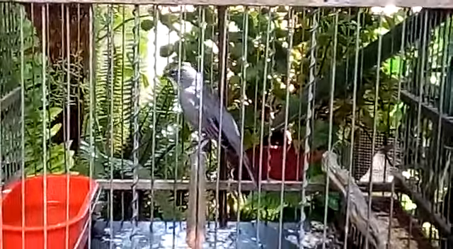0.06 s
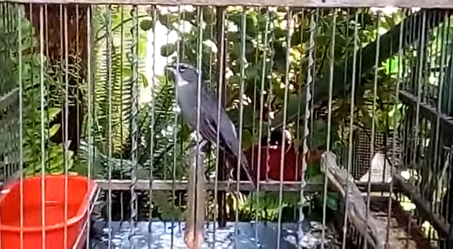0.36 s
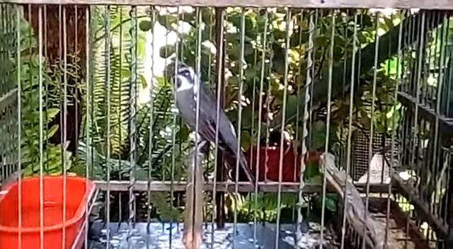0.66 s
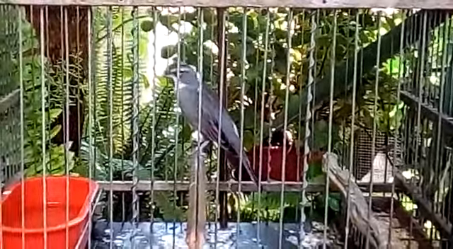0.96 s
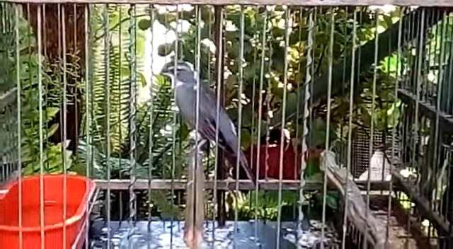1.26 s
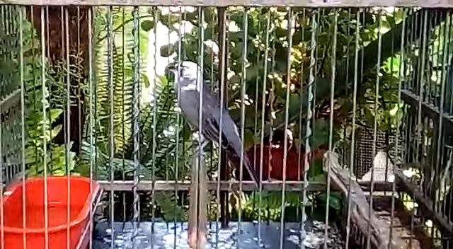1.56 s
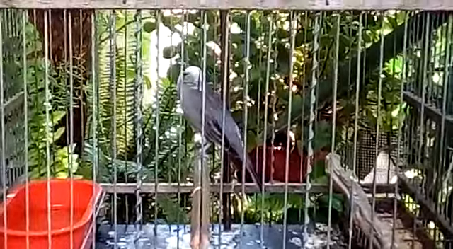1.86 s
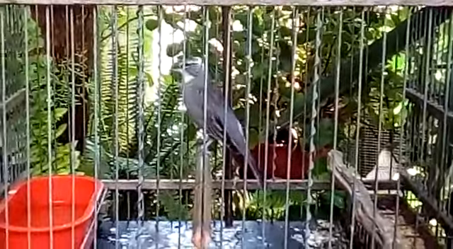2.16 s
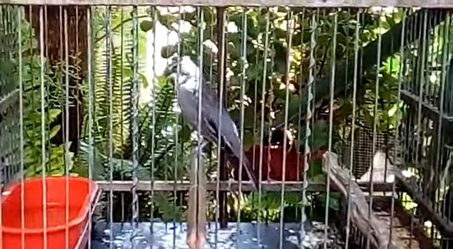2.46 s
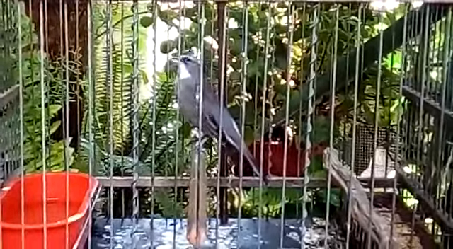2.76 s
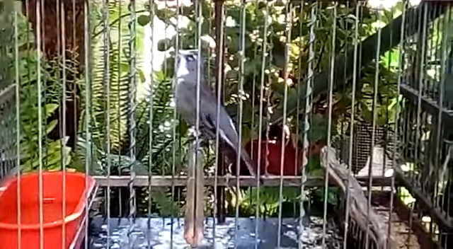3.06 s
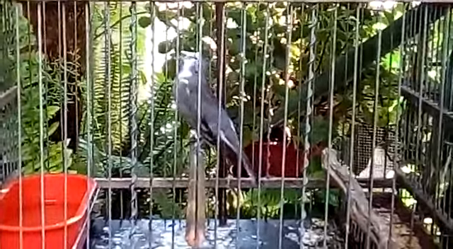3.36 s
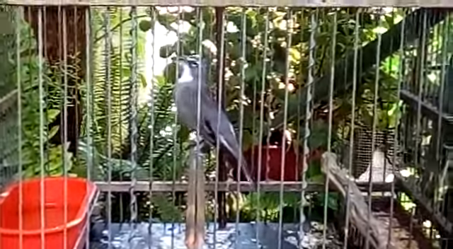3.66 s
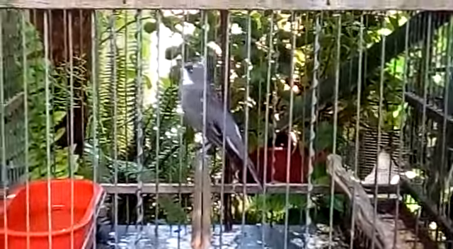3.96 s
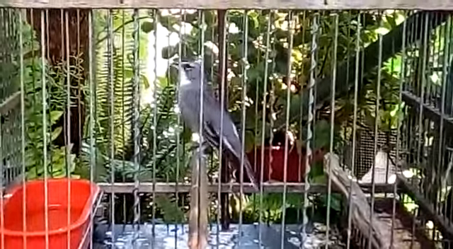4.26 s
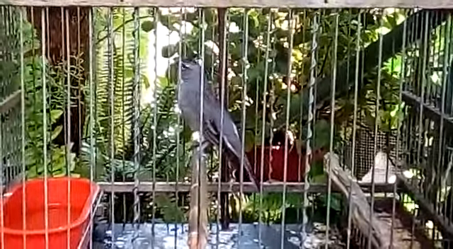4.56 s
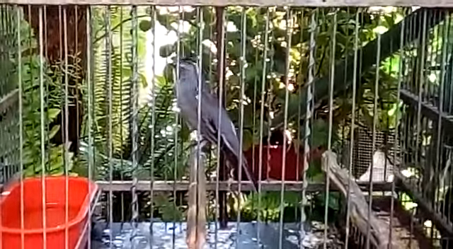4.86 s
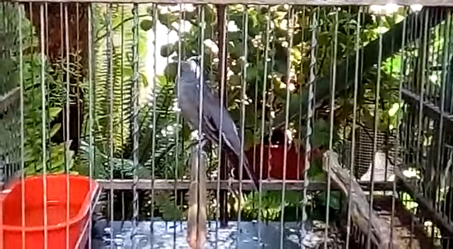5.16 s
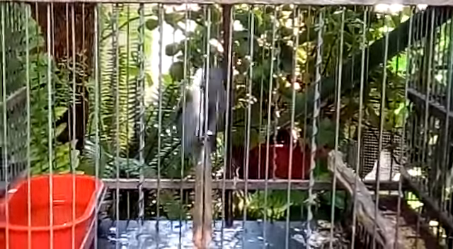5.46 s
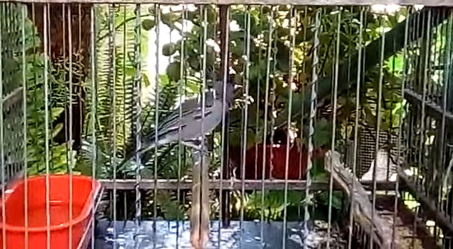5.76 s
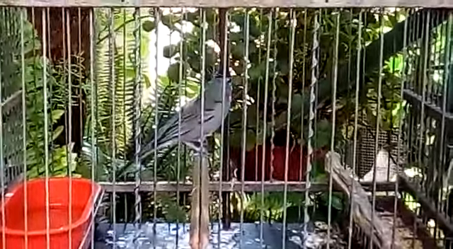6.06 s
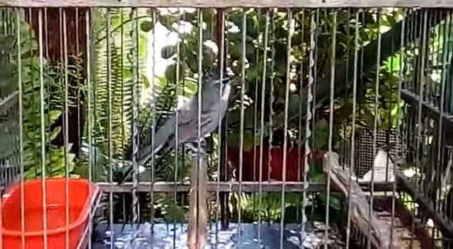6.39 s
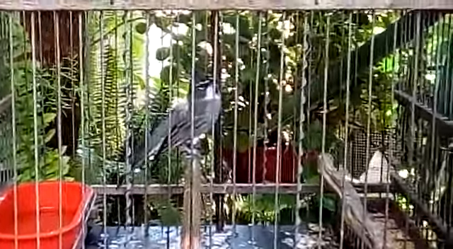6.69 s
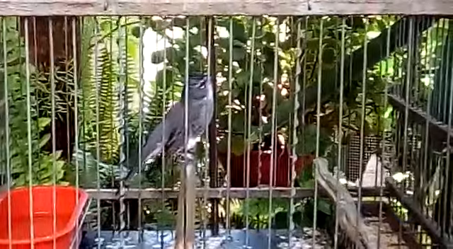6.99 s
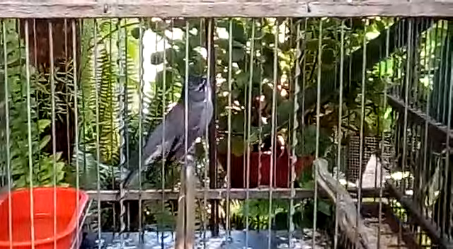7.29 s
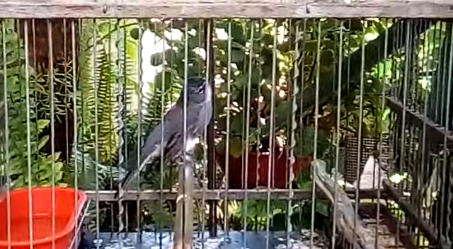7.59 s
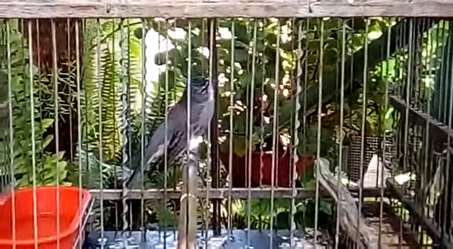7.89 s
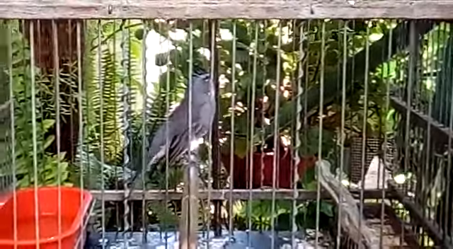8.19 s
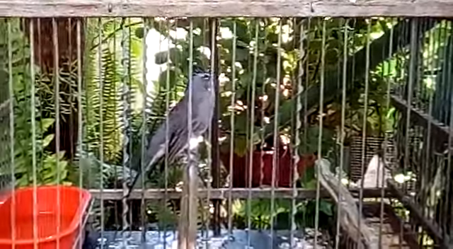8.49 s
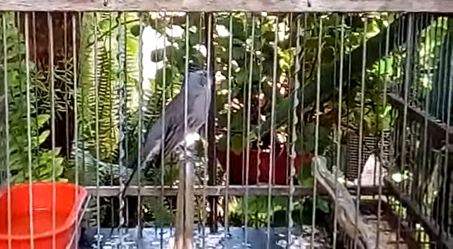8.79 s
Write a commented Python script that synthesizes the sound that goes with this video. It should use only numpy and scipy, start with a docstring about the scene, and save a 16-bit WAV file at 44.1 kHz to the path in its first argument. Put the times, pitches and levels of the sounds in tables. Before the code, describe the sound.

Loud, gliding whistles from a nearby songbird come in two phrases over a quiet garden hush and far-off chirping.

```python
"""A caged songbird close by sings two phrases of six loud slurred whistles. Each is a gliding tone that
swells where it crosses the resonance of the throat; faint overtones leave through the beak.
The cage adds quick reflections, and the garden walls reverberate after each note. Other birds chirp
farther off, mostly as echo, among soft scuffs and faint hoots. Behind them lie a quiet outdoor hush
and the drone of distant traffic."""
import sys
import numpy as np
from scipy import signal
from scipy.fft import rfft, irfft, next_fast_len
from scipy.io import wavfile
from scipy.ndimage import uniform_filter1d, map_coordinates

SR = 44100
rng = np.random.default_rng(int(sys.argv[2]) if len(sys.argv) > 2 else 0)


def put_to_file(sound):
    """Save the sound as 16-bit audio at rate SR, in the file named by the first command-line argument."""
    columns = np.atleast_2d(sound).T  # one column per channel
    safe = np.clip(columns, -1, 1)
    whole_steps = np.round(safe * 32767)
    wavfile.write(sys.argv[1], SR, whole_steps.astype(np.int16))


N = 389844


def amp(db):
    """Amplitude ratio of a level in decibels."""
    return 10 ** (np.asarray(db) / 20)


def unit(x):
    """Normalisation to rms 1."""
    return x / np.sqrt(np.mean(x ** 2) + 1e-20)


def along(points, hz):
    """Interpolation of (Hz, value) points on a logarithmic frequency axis."""
    freqs, values = np.transpose(points)
    return np.interp(np.log(hz + 1), np.log(freqs + 1), values)


def curves(rows):
    """Linear interpolation in time: one curve for each column after the first."""
    times, *columns = np.transpose(rows)
    return [np.interp(np.arange(N) / SR, times, column) for column in columns]


def wobble(rate, size):
    """Smooth random modulation with `rate` knots a second."""
    knots = rng.standard_normal(int(size * rate / SR) + 4)
    return map_coordinates(knots, [np.arange(size) * rate / SR])


def filtered(x, response):
    """Linear filtering: the spectrum is multiplied by a frequency response."""
    size = next_fast_len(N + SR // 2)
    return irfft(rfft(x, size) * response(np.fft.rfftfreq(size, 1 / SR)), size)[:N]


def coloured(x, spectrum):
    """Spectral shaping by a curve of (Hz, dB) points."""
    return filtered(x, lambda hz: amp(along(spectrum, hz)))


def noise(spectrum):
    """Spectrally shaped Gaussian noise of rms 1."""
    return unit(coloured(rng.standard_normal(N), spectrum))


def add(track, start, sound):
    """Superposition of a sound on the track, from `start` seconds."""
    part = track[max(0, round(start * SR)):][:len(sound)]
    part += sound[:len(part)]


def partial(pitch, order=1):
    """One harmonic: phase is the integral of frequency. Silent above the Nyquist limit."""
    return np.sin(2 * np.pi * order * np.cumsum(pitch) / SR) * (order * pitch < SR / 2)


def slur(times, hz, waver, waver_rate, glide_s=0.0044, attack_s=0.0092, release_s=0.0073):
    """Frequency modulation: the pitch and on-off gate of a gliding, wavering tone."""
    times = np.sort(times)
    t = np.arange(0, times[-1], 1 / SR)
    log_pitch = np.interp(t, times, np.log(hz))
    pitch = np.exp(uniform_filter1d(log_pitch, max(1, int(glide_s * SR)), mode="nearest"))
    edges = np.clip(np.minimum(t / attack_s, (t[-1] - t) / release_s), 0, 1)
    gate = np.sin(np.pi / 2 * edges) ** 2
    return pitch * (1 + waver * np.tanh(wobble(waver_rate, len(t)))), gate


def swept(length, hz, db, waver, waver_rate, edge_db=4.5):
    """Pitch and envelope of a sweep through pitches evenly spaced in time, loudest halfway."""
    pitch, gate = slur(np.linspace(0, length, len(hz)), hz, waver, waver_rate)
    return pitch, gate * amp(db - edge_db * np.linspace(-1, 1, len(gate)) ** 2)


def patchy(x, depth_db, corner_hz=2500):
    """Random amplitude modulation: low and middle bands swell and sink independently."""
    hz, _, spectra = signal.stft(x, SR, nperseg=2048)
    field = uniform_filter1d(rng.standard_normal(spectra.shape), size=3, axis=0)
    field = uniform_filter1d(field, size=7, axis=1)
    depth = depth_db / (1 + (hz[:, None] / corner_hz) ** 2)
    return signal.istft(spectra * amp(depth * unit(field)), SR, nperseg=2048)[1][:N]


# Spectra of the hush and the traffic. Each row: frequency in Hz, relative spectral density in dB.
HUSH_SPECTRUM = [(25, -12.5), (55, -5), (120, -3), (300, -2.5), (700, -5), (1300, -7), (1900, -9),
                 (3000, -16), (6300, -18.5), (8500, -31.5), (13500, -30.5), (15200, -20)]
RUMBLE_SPECTRUM = [(25, -33), (60, -14.5), (85, -4.5), (160, 10), (260, -28.5), (600, -59.5)]
DRONE_SPECTRUM = [(80, -41.5), (170, -7), (230, -2), (280, -1), (380, -18.5), (900, -49.5)]
# Swell of the traffic. Each row: time in seconds, relative levels of rumble and drone in dB.
TRAFFIC_LEVELS = [(0.0, -81, -79), (0.93, -78, -88), (1.77, -81, -73.5), (2.56, -75.5, -71),
                  (3.99, -73.5, -75.5), (4.41, -74, -69), (5.12, -78.5, -74), (8.1, -79, -77.5),
                  (8.84, -77, -67)]


def hush_and_traffic(hush_db=-66.5, rumble_db=-1, drone_db=-4):
    """Incoherent noises add: a broad outdoor hush and two low bands of distant traffic."""
    rumble_level, drone_level = curves(TRAFFIC_LEVELS)
    rumble = amp(rumble_level + rumble_db) * noise(RUMBLE_SPECTRUM)
    drone = amp(drone_level + drone_db) * noise(DRONE_SPECTRUM)
    hush = amp(hush_db) * noise(HUSH_SPECTRUM)
    return patchy(hush + rumble + drone, depth_db=2.5)


# Throb of one far engine's hum. Each row: time in seconds, relative level in dB.
HUM_LEVELS = [(2.0, -81), (2.48, -60.5), (2.57, -84.5), (2.68, -59.5), (2.88, -78.5), (2.93, -62),
              (3.12, -76), (3.2, -58), (3.35, -82), (3.52, -59), (3.81, -99), (3.92, -66), (5.45, -81.5),
              (5.56, -61.5), (5.94, -98), (6.06, -73), (7.22, -83.5), (7.28, -70), (7.7, -65.5),
              (7.83, -82), (8.25, -60), (8.57, -74.5), (8.76, -53.5), (8.84, -62)]
# Drift of that hum. Each row: time in seconds, pitch in Hz.
HUM_PITCH = [(2.0, 214.7), (2.7, 226), (3.3, 221.3), (5.5, 217.8), (8.84, 220.9)]
# Other engines. Each row: start and length in seconds, first and last pitch in Hz, mid level in dB.
ENGINE_TONES = [(0.799, 3.1, 117.1, 126.9, -76.5), (2.2, 1.02, 271.4, 273.2, -69),
                (3.35, 0.34, 271, 268.2, -70.5), (4.15, 0.69, 165.5, 170, -69),
                (5.3, 0.46, 175.3, 174.6, -72), (6.1, 0.36, 182.3, 190.6, -70),
                (5.1, 1.3, 83.4, 88.9, -74.5)]


def engines(hum_db=-2, throb_db=2):
    """Frequency follows engine speed: low, distant tones glide and throb."""
    pitch = curves(HUM_PITCH)[0] * (1 + 0.005 * wobble(36, N))
    fade_in = np.clip(np.arange(N) / SR - HUM_LEVELS[0][0] + 1, 0, 1)
    level = amp(curves(HUM_LEVELS)[0] + hum_db + throb_db * wobble(12, N))
    out = level * fade_in * unit(partial(pitch))
    for start, length, *hz, db in ENGINE_TONES:
        pitch, level = swept(length, hz, db, waver=0.0087, waver_rate=110)
        throb = amp(throb_db * wobble(3, len(level)))
        add(out, start, level * throb * partial(pitch))
    return out


# Spectrum of a scuff. Each row: frequency in Hz, relative spectral density in dB.
SCUFF_SPECTRUM = [(150, -30), (550, -0.5), (1900, -6), (3500, -13), (9000, -49)]
# Soft scuffs nearby. Each row: time of the peak in seconds, relative level in dB.
SCUFF_PEAKS = [(0.171, -61), (2.109, -65), (3.502, -69.5), (4.02, -70.5), (4.52, -68)]


def scuffs(width_s=0.037):
    """Noise under brief Gaussian envelopes is heard as soft scuffs."""
    t = np.arange(N) / SR
    envelope = sum(amp(db) * np.exp(-((t - peak) / width_s) ** 2) for peak, db in SCUFF_PEAKS)
    return envelope * noise(SCUFF_SPECTRUM)


# Faint far hoots. Each row: start and length in seconds, pitch in Hz, relative level in dB.
FAR_HOOTS = [(0.149, 0.62, 1850, -77.5), (4.102, 0.097, 848, -62.5), (6.6, 0.086, 535.6, -65)]


def hoots(waver=0.047):
    """Random frequency modulation makes each swelling tone unsteady."""
    out = np.zeros(N)
    for start, length, hz, db in FAR_HOOTS:
        size = int(length * SR)
        pitch = hz * (1 + waver * wobble(100, size))
        add(out, start, amp(db) * np.hanning(size) * partial(pitch))
    return out


# Reverberation of the garden. Each row: frequency in Hz, time to decay by 60 dB in seconds.
GARDEN_T60 = [(300, 0.72), (1500, 0.51), (4000, 0.4), (7000, 0.3), (15000, 0.031)]


def garden(x, build_s, early_db, early_t60):
    """Diffuse reverberation from the walls: a dense early part, and a tail that dies sooner in treble."""
    hz, t, spectra = signal.stft(rng.standard_normal(SR), SR, nperseg=256)
    late = amp(-60 * t / along(GARDEN_T60, hz)[:, None])
    early = amp(early_db - 60 * t / early_t60)
    response = signal.istft(spectra * (late + early), SR, nperseg=256)[1]
    response *= 1 - np.exp(-np.arange(len(response)) / SR / build_s)
    return signal.fftconvolve(x, response / np.linalg.norm(response))[:N]


# Share of the song that reaches the walls. Each row: frequency in Hz, relative gain in dB.
WALL_SPREAD = [(1500, -1.5), (2300, 4), (3000, 1), (3700, -8), (4500, 0), (6300, 3), (8000, -1), (15000, 0)]


def song_echo(song):
    """The reverberant field takes the colour of the sound that reaches the walls."""
    return garden(coloured(song, WALL_SPREAD), build_s=0.0091, early_db=7, early_t60=0.18)


# Reflections from the tray and nearby boards. Each row: delay in seconds, gain in dB.
CAGE_REFLECTIONS = [(.00118, -25.5), (.00188, -27.5), (.0024, -21.5), (.003, -20), (.0054, -14.5),
                    (.008, -12)]


def cage(x):
    """Comb filtering: quick, weak reflections interfere with the direct sound."""
    return filtered(x, lambda hz: 1 + sum(amp(db) * np.exp(-2j * np.pi * hz * delay)
                                          for delay, db in CAGE_REFLECTIONS))


# Resonances of the beak. Each row: frequency in Hz, gain in dB.
BEAK_RESPONSE = [(2500, 2.5), (4000, 18), (5200, 3), (6400, -15), (7500, -17), (9200, -20.5), (11200, -9.5),
                 (12600, -20), (15200, 2.5)]


def beak(harmonics):
    """Resonance colours the overtones as they leave the beak."""
    return coloured(harmonics, BEAK_RESPONSE)


# Chirps farther off. Each row: start and length in seconds; first, middle and last pitch in Hz;
# pitch shake in Hz; relative level in dB; octave against fundamental in dB, ahead of the beak.
CHIRPS = [ (0.0, 0.086, 6280, 6280, 5300, 426, -40, -47), (0.052, .068, 5466, 4440, 3120, 332, -34.5, -44),
          (0.12, .045, 3500, 3750, 3740, 200, -45, -40), (0.219, 0.086, 6180, 6220, 5150, 420, -39.5, -29),
          (0.28, .063, 5520, 4370, 3180, 336, -35, -34), (0.352, 0.04, 3364, 3610, 3670, 160, -42.5, -30),
          (0.881, 0.028, 6400, 6880, 7360, 453, -43, -10), (0.872, 0.044, 3730, 5400, 6100, 550, -51, 0),
          (0.908, 0.0275, 6600, 6330, 6300, 446, -41.5, -20),
          (1.781, 0.1, 4740, 4150, 5100, 425, -57.5, -34), (4.503, 0.097, 4853, 3910, 5050, 420, -54, -27),
          (4.592, 0.035, 5420, 6200, 6520, 418, -49, -30), (4.57, 0.041, 7300, 7800, 7930, 350, -63, -39),
          (5.055, 0.0261, 6800, 5850, 5630, 347, -47, -34), (5.411, 0.1, 3590, 3200, 2660, 400, -58.5, -33),
          (5.69, 0.089, 3400, 3040, 2230, 350, -58.5, -30), (5.751, 0.058, 2234, 2774, 3140, 350, -49, -35),
          (6.07, 0.078, 2162, 2415, 2390, 300, -42, -19),
          (6.263, 0.085, 5200, 3940, 3410, 400, -43.5, -38.5),
          (6.306, .055, 3220, 3086, 3090, 178, -41.5, -36.5),
          (7.976, 0.025, 7200, 5190, 5120, 380, -43, -27), ]


def far_birds():
    """Rapid frequency modulation by a few hundred hertz makes each chirp buzz."""
    fundamentals, octaves = np.zeros(N), np.zeros(N)
    for start, length, *hz, shake_hz, db, octave_db in CHIRPS:
        pitch, level = swept(length, hz, db, waver=shake_hz / hz[1], waver_rate=700)
        add(fundamentals, start, level * partial(pitch))
        add(octaves, start, amp(octave_db) * level * partial(pitch, order=2))
    return fundamentals + beak(octaves)


# Breaks in the caged bird's voice. Each row: start and length in seconds, pitch in Hz, level in dB.
VOICE_BREAKS = [(2.884, 0.06, 6210, -57), (3.291, 0.022, 7160, -43), (6.401, 0.099, 6700, -68),
                (7.224, 0.014, 7045, -34.5)]


def rasps(octave_db=-8):
    """Fast pitch jitter spreads a high tone into a thin band of noise where the voice breaks."""
    fundamentals, octaves = np.zeros(N), np.zeros(N)
    for start, length, hz, db in VOICE_BREAKS:
        pitch, level = swept(length, [hz, hz], db, waver=0.07, waver_rate=1600)
        add(fundamentals, start, level * partial(pitch))
        add(octaves, start, amp(octave_db) * level * partial(pitch, order=2))
    return fundamentals + beak(octaves)


def overtones(pitch, slope=0.4, octave_db=-8, jitter=0.008):
    """Harmonics 2 to 7, each broadened by its own jitter; the octave is held back."""
    out = np.zeros(len(pitch))
    for order in range(2, 8):
        gain = amp(octave_db) if order == 2 else (order / 2) ** -slope
        out += gain * partial(pitch * (1 + jitter * wobble(900, len(pitch))), order)
    return out


# Resonance of the throat. Each row: pitch in Hz, gain of the whistle in dB.
THROAT_RESPONSE = [(1400, -41.5), (1700, -32.5), (2100, -32), (2500, -29), (2900, -22.5), (3300, -18.5),
                   (3700, -13.5), (4200, -17.5), (4800, -22.5), (5500, -28), (7000, -38.5)]


def sing(syllable, stretch, db, fade_db):
    """Pitch and envelope of one note, which swells where it crosses the throat's resonance."""
    times, hz, push_db = np.transpose(syllable)
    pitch, gate = slur(times * stretch, hz, waver=0.003, waver_rate=600, glide_s=0.0022)
    pitch *= 1 + 0.003 * wobble(60, len(pitch))
    t = np.arange(len(pitch)) / SR
    effort_db = db + np.interp(t, np.sort(times) * stretch, push_db) - fade_db * t / t[-1]
    return pitch, gate * amp(effort_db + along(THROAT_RESPONSE, pitch))


# Syllables, each one vocal gesture. Each row: unstretched time in seconds, pitch in Hz, push in dB.
ZIGZAG = [(0, 5000, -3.5), (.007, 4660, -2), (0.022, 2660, -2.5), (0.039, 1449, -0.5), (0.055, 2495, 0),
          (.07, 2412, 2), (0.083, 1700, 0.5), (.097, 3166, -1.5), (0.107, 3567, -0.5), (0.118, 3735, -7.5)]
FALL = [(0, 4132, -18.5), (0.025, 5410, -10.5), (0.043, 5174, -1.5), (.051, 4425, -0.5),
        (0.068, 3727, -0.5), (.091, 3010, -4.5), (.124, 2488, -3.5), (0.16, 2270, -2), (0.183, 2258, -1)]
WHIP = [(0, 2670, -7), (.007, 2812, -4.5), (.019, 1679, 0.5), (.033, 2668, -1.5), (0.048, 4760, -1.5),
        (.061, 3770, 0.5), (0.08, 2680, -1.5), (.107, 2040, 2.5), (0.134, 1699, 1.5), (0.179, 1434, -4.5)]
TUMBLE = [(0, 5670, -2.5), (.02, 6870, 1.5), (0.025, 5863, -16.5), (.031, 4744, 1), (.039, 3648, -5.5),
          (.048, 2864, -1), (.063, 4237, -1), (.073, 3727, 1), (.085, 2700, -2), (.101, 2089, 0),
          (.121, 3097, -3.5), (.139, 3600, -3)]
RISE = [(0, 1930, -2), (0.014, 1998, -4.5), (.04, 2557, -4), (0.069, 3216, -1), (.095, 3477, 3),
        (.125, 3608, 1.5), (.165, 3744, 0), (0.201, 3795, 2.5), (.225, 3761, -1.5), (0.249, 3750, -3)]
ARCH = [(0, 2632, -10), (0.013, 2866, -4), (0.027, 3880, -3.5), (0.039, 4050, 3), (.056, 3763, -3.5),
        (.081, 2530, -2), (.106, 2277, -5), (0.176, 2208, -4), (0.189, 2145, 4), (.221, 2041, -3.5)]
SCOOP = [(0, 4393, -13.5), (0.017, 5360, -1.5), (0.044, 3440, -5), (.06, 2510, 0), (0.079, 1944, 4.5),
         (.096, 1552, -5), (0.122, 2761, 2), (.132, 3380, 2), (0.147, 3784, -8.5), (0.161, 3710, -1)]
PLUNGE = [(0, 3463, -7), (.009, 3990, -12.5), (.026, 6275, 5.5), (0.04, 3930, -4), (0.048, 2663, -5),
          (.065, 2112, 6), (.085, 1524, 7), (.096, 2179, 2.5), (0.112, 3502, -7.5), (.126, 3600, 6.5)]
# The two phrases. Each row: start in seconds, syllable, time stretch as a ratio, relative level in dB,
# fade over the note in dB, overtone level in dB ahead of the beak.
SONG_NOTES = [ (2.008, ZIGZAG, .94, -13.5, -5.5, -77.5), (2.429, FALL, 1.028, -2.5, -0.5, -67),
              (2.87, WHIP, 0.99, -1, 0.5, -62), (3.281, TUMBLE, 0.99, -2.5, -2, -55.5),
              (3.663, RISE, 0.97, -1, -1, -58.5), (4.193, ARCH, 1.01, -2, 0.5, -60),
              (5.948, SCOOP, 1.0, -8, 1, -69.5), (6.389, ZIGZAG, 1.006, -1, 0.5, -63),
              (6.786, WHIP, .98, 0.5, 2, -58.5), (7.209, TUMBLE, 0.99, 0.5, 0, -52.5),
              (7.608, RISE, 1.025, -1, -1, -58.5), (8.085, PLUNGE, 0.98, -7, -1, -58.5), ]


def songbird(jitter=0.012, flutter_db=3, flare_db=4, overtone_growth=0.39):
    """Source and filter: the throat favours the fundamental, and the beak shapes the faint overtones."""
    whistle, harmonics = np.zeros(N), np.zeros(N)
    for start, syllable, stretch, db, fade_db, overtone_db in SONG_NOTES:
        pitch, level = sing(syllable, stretch, db, fade_db)
        effort = level / level.max()
        roughness = 1 - effort  # steady at full effort, rough where weak
        pitch *= 1 + jitter * roughness * wobble(500, len(level))
        level *= amp(flutter_db * roughness * wobble(250, len(level)))
        add(whistle, start, level * partial(pitch))
        # the overtones swell less than the fundamental and flare briefly
        flare = amp(flare_db * wobble(90, len(level)))
        add(harmonics, start, amp(overtone_db) * flare * effort ** overtone_growth * overtones(pitch))
    return whistle + beak(harmonics)


def scene():
    """The direct-to-reverberant ratio falls with distance: the near bird is clear, the rest mostly echo."""
    near = songbird() + rasps()
    far = far_birds()
    song = cage(near) + amp(-8.5) * song_echo(near)
    chirps = amp(-8.5) * far + amp(-3.5) * garden(far, build_s=0.0081, early_db=-4, early_t60=0.17)
    small_sounds = amp(3.5) * garden(scuffs() + hoots(), build_s=0.003, early_db=7, early_t60=0.044)
    return (song + chirps + small_sounds + engines() + hush_and_traffic())[None]


def record(dry, cutoff_hz=15700):
    """Band limiting: an ideal low-pass filter removes the highest treble."""
    return filtered(dry[0], lambda hz: hz < cutoff_hz)[None]


dry = scene()
out = record(dry)
put_to_file(out)
```